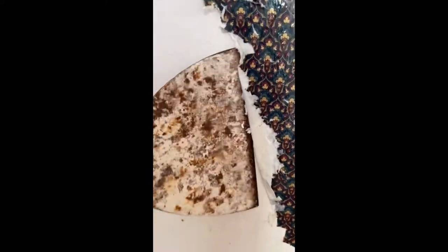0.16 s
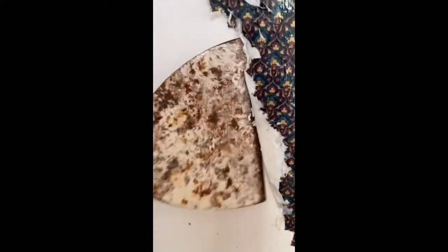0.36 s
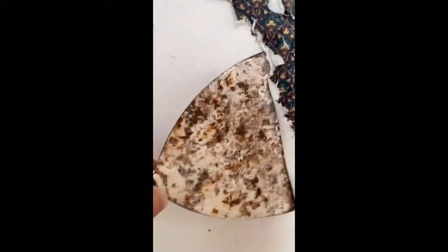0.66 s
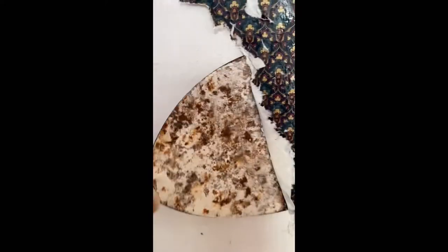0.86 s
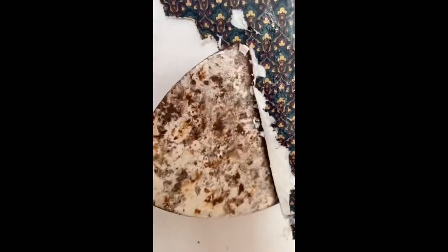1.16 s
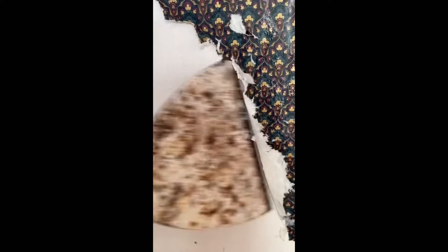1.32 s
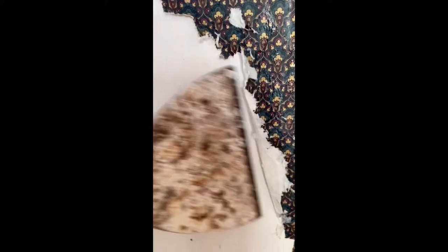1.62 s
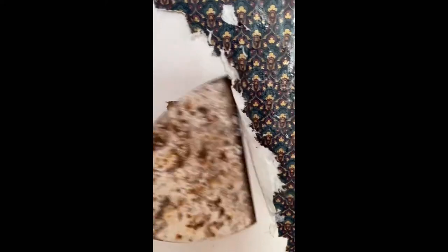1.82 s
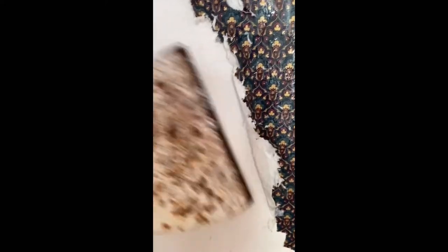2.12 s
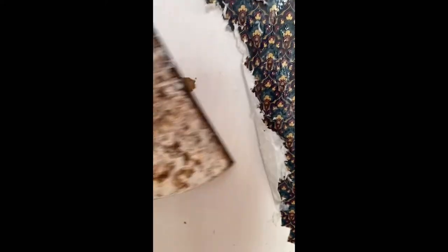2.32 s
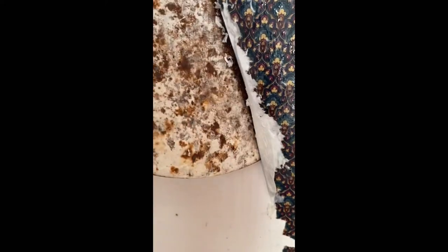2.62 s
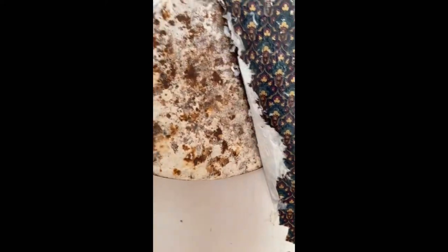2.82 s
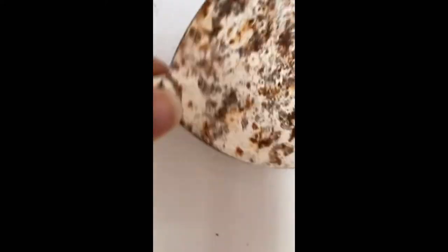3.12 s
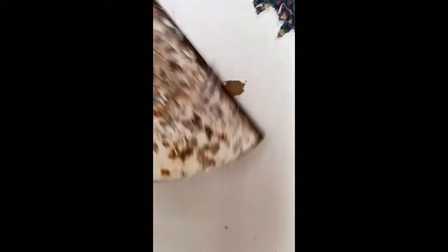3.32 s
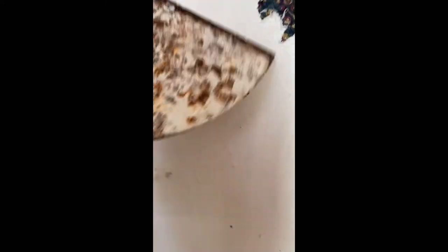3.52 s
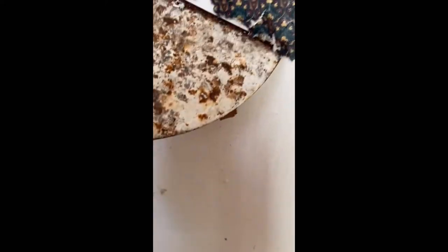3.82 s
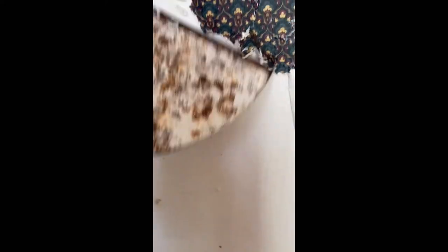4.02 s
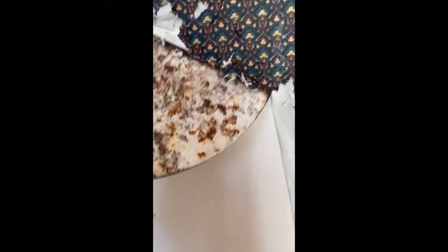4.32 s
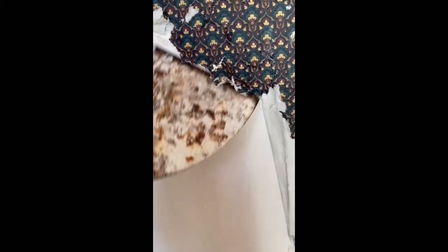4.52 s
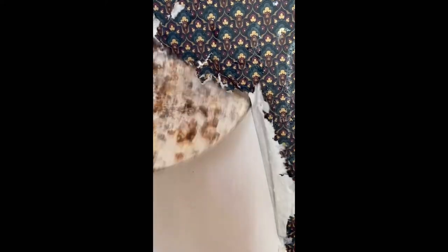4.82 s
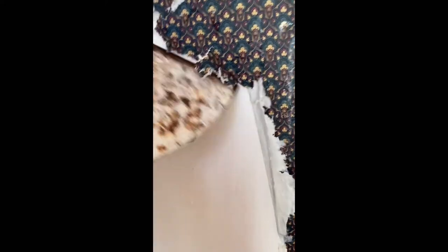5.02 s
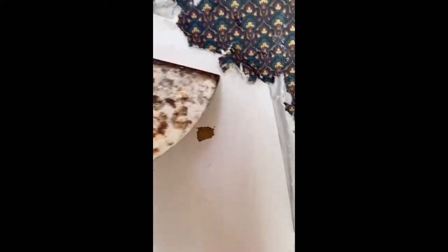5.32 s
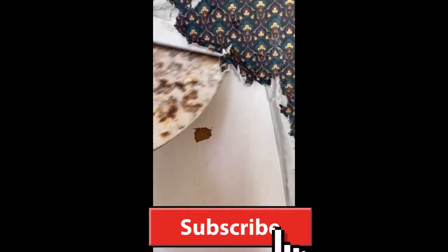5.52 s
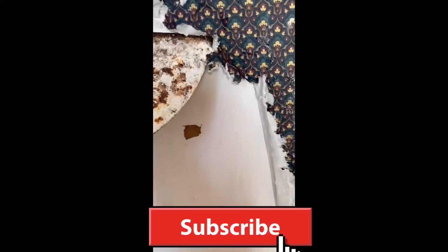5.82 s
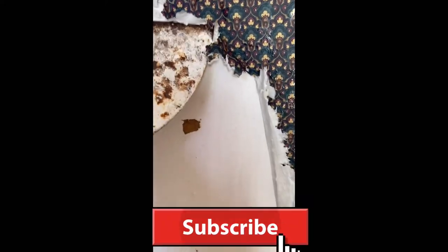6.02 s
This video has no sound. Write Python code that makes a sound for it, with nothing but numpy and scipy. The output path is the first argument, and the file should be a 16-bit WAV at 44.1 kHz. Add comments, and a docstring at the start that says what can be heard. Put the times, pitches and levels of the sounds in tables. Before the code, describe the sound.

A metal scraper works on a hollow wall, heard close up with short room reflections. Brief dry scratches rise and stop in woody, drum-like knocks, regular at first, then irregular with light scuffs, blade clicks and low wall rumble. Heavier pushes return later, then weaken. Two tiny crisp paper cracks occur late, over quiet low room noise.

```python
"""At a hollow wall in a bare room: a wide steel scraper is pushed under softened wallpaper, close to a two-port mic.
Grit clicks ring the blade modes, filtered clicks hiss off the paper, and the same hand shakes the wall modes.
Most pushes end in a thud as the edge jams: sinking sines, then a scattered rumble. The blade ticks now and then,
and two dry flakes crack. Sparse reflections give the room, drifting filtered noise its air; both ports hear it all."""
import sys
import numpy as np
from scipy import signal
from scipy.fft import rfft, irfft
from scipy.io import wavfile
from scipy.ndimage import uniform_filter1d

SR = 44100
rng = np.random.default_rng(int(sys.argv[2]) if len(sys.argv) > 2 else 0)


def to_wav(s):
    """Save 16-bit WAV."""
    ch = np.atleast_2d(s).T  # columns
    pcm = np.round(np.clip(ch, -1, 1) * 32767)  # PCM
    wavfile.write(sys.argv[1], SR, pcm.astype(np.int16))


N = 271656


def gain_of(db):
    """Amplitude factor of a level in dB."""
    return 10 ** (np.asarray(db) / 20)


def unit_rms(x):
    """Scales to RMS 1."""
    return x / np.sqrt(np.mean(x ** 2) + 1e-20)


def curve(points, hz):
    """Reads a frequency table, linear over log frequency."""
    f, value = np.transpose(points)
    return np.interp(np.log(hz + 1), np.log(f + 1), value)


def add(mix, start_s, sound):
    """Adds a sound in place, cut at the end of the mix."""
    part = mix[round(start_s * SR):][:len(sound)]
    part += sound[:len(part)]


def coloured(x, points):
    """Filters by a (hz, db) table, phase unchanged."""
    gain = gain_of(curve(points, np.fft.rfftfreq(len(x), 1 / SR)))
    return irfft(rfft(x) * gain, len(x))


def driven(modes, fall_db, centre_hz):
    """Weights modes by the drive, changed by fall_db one octave off its centre."""
    octaves = np.log2(np.transpose(modes)[0] / centre_hz)
    return modes + np.outer(fall_db * octaves ** 2, [0, 1, 0])


def ring(modes, length_s, spread_db):
    """One blow on an object, energy 1; the struck spot sets size, pitch and phase of each mode by chance."""
    hz, db, t60_s = np.transpose(modes)[:, :, None]
    t = np.arange(round(length_s * SR)) / SR
    size, detune, phase = rng.standard_normal((3, len(modes), 1))
    swing = np.sin(2 * np.pi * (hz * (1 + 0.017 * detune) * t + phase))
    rise = 1 - np.exp(-t * hz / 0.42)
    out = (gain_of(db + spread_db * size - 60 * t / t60_s) * swing * rise).sum(0)
    return out / np.linalg.norm(out)


def grit(size, per_s, spread_db):
    """Crumbs of plaster and paste catching the edge: random clicks of uneven size, RMS 1."""
    sizes = gain_of(spread_db * np.minimum(rng.exponential(1, size), 3))
    hits = rng.random(size) < per_s / SR
    return unit_rms(rng.standard_normal(size) * hits * sizes)


def scatter(x, t60_s):
    """Sparse decaying reflections of random sign, energy 1."""
    t = np.arange(round(t60_s * SR)) / SR
    taps = grit(len(t), 2000, 0.34) * gain_of(-60 * t / t60_s)
    return signal.fftconvolve(x, taps / np.linalg.norm(taps))


# blade modes: hz, level_db, t60_s
BLADE_MODES = [(418, 3, 0.032), (674, 4.5, 0.019), (907, 0.5, 0.021), (1268, 2.5, 0.017),
               (1577, 1.5, 0.018), (1950, -0.5, 0.015), (2291, 0, 0.019), (2716, -3, 0.0098),
               (3010, -13.5, 0.014), (3330, -14, 0.019), (3770, -19, 0.045), (4420, 0, 0.0064),
               (5160, -13, 0.035)]
# wall modes: hz, level_db, t60_s (free time in a stroke)
WALL_MODES = [(63.2, 5.5, 0.14), (91, -13, 0.14), (115, -7, 0.09), (156.2, 10, 0.15), (202.5, 0, 0.098),
              (263, 0, 0.12), (305, 0.5, 0.1), (362.3, 0.5, 0.072), (427.3, -1, 0.063), (624, -9, 0.078)]
# paper hiss colour, also of the tick's snap: hz, level_db
HISS_COLOUR = [(1500, -3), (3000, 2), (5200, -1.5), (6500, -4), (9000, -8.5), (11000, -14), (13500, -20),
               (15500, -34)]
SPOTS = 6  # places along the edge that the grit strikes
LEAN_S, LINGER_S = 0.015, 0.027  # the hand leans on the wall a little earlier and longer
GRATE_FALL_DB = -2.5  # drive one octave off its centre
HISS_SWELL = 0.75  # share of the swell that the hiss follows


def stroke(length_s, attack_s, mid_db, change_db, hiss_db, deep_db, upper_db, centre_hz, release_s):
    """Grit rings the blade at several spots, hisses off the paper and shakes the wall; starts LEAN_S early."""
    t = np.arange(-LEAN_S, length_s + LINGER_S + release_s, 1 / SR)
    # the edge sticks and slips
    judder = [unit_rms(j) for j in uniform_filter1d(rng.standard_normal((SPOTS + 2, len(t))), 180)]
    swell_db = change_db * (np.clip(t / length_s, 0, 1) - 1)
    contact = np.clip(np.minimum(t / attack_s, 1 + (length_s - t) / release_s), 0, 1)
    force = gain_of(mid_db + change_db / 2) * contact ** 0.84

    modes = driven(BLADE_MODES, GRATE_FALL_DB, centre_hz)
    blade = 0
    for j in judder[:SPOTS]:
        clicks = force * gain_of(swell_db + 2.6 * j) * grit(len(t), 800, 1.6)
        blade = blade + signal.fftconvolve(clicks, ring(modes, 0.04, 4.5)) / np.sqrt(SPOTS)

    hiss_gain = gain_of(hiss_db + HISS_SWELL * swell_db + 0.95 * judder[-2])
    paper = unit_rms(coloured(grit(len(t), 9000, 1.0), HISS_COLOUR))
    hiss = force * contact * hiss_gain * paper

    lean_shape = np.clip(np.minimum(1 + t / LEAN_S, (t[-1] - t) / LINGER_S), 0, 1) ** 2
    shake = gain_of(mid_db + 1.5 * judder[-1]) * lean_shape * grit(len(t), 2500, 0.6)
    deep = [m for m in WALL_MODES if m[0] < 225]
    upper = [m for m in WALL_MODES if m[0] > 225]
    out = signal.fftconvolve(shake * gain_of(deep_db), ring(deep, 0.15, 1.64))
    out += signal.fftconvolve(shake * gain_of(upper_db), ring(upper, 0.15, 1.64))
    add(out, 0, blade)
    add(out, 0, hiss)
    return out


# pushes up to a jam: start_s, jam_s, jam_db (grating), swell_db, hiss_db (above grating), centre_hz (drive)
PUSHES = [(0.073, 0.107, -36.5, 6, -10, 1190), (0.309, 0.348, -32.5, 4.5, -9.5, 1780),
          (0.553, 0.591, -32.5, 2.5, -9, 1950), (0.787, 0.824, -28, 14, -8.5, 1520),
          (1.045, 1.099, -30.5, 8.5, -16.5, 2000), (1.302, 1.34, -34, 11, -10.5, 1370),
          (1.572, 1.622, -31, 5.5, -12, 1500), (1.832, 1.872, -34, 0, -8, 1500),
          (4.109, 4.179, -28.5, 10.5, -9.5, 1590), (4.726, 4.794, -25.5, 13.5, -10, 1510),
          (4.996, 5.045, -45.5, 7, -6, 1000), (5.316, 5.359, -40.5, -2.5, -1, 1380),
          (5.598, 5.641, -43.5, -6, -7.5, 885)]
PUSH_ATTACK_S, PUSH_RELEASE_S = 0.031, 0.014
PUSH_DEEP_DB, PUSH_UPPER_DB = -1, -4.5  # wall rumble, above the mid-push grating


def add_pushes(work):
    """Pushes gather speed and change in level until the edge jams, most of them swelling."""
    for start_s, jam_s, jam_db, swell_db, hiss_db, centre_hz in PUSHES:
        sound = stroke(jam_s - start_s, PUSH_ATTACK_S, jam_db - swell_db / 2, swell_db, hiss_db,
                       PUSH_DEEP_DB, PUSH_UPPER_DB, centre_hz, PUSH_RELEASE_S)
        add(work, start_s - LEAN_S, sound)


# free scrapes: start_s, length_s, attack_s, mid_db (grating), change_db (start to end),
# hiss_db, deep_db, upper_db (hiss and wall rumbles above grating), centre_hz (drive)
SCRAPES = [(0.244, 0.045, 0.011, -43, 1, -13, -17, -5, 1500),
           (0.471, 0.072, 0.012, -44, -4, -10, -9, -17, 1500),
           (0.723, 0.049, .016, -39.5, -8, -12, -18, -18, 1670),
           (0.939, 0.066, .016, -40, -5, -11, -13, -7.5, 1510),
           (1.462, 0.055, .016, -40, 19.5, -20, -11, -6, 1400),
           (1.748, 0.03, 0.013, -42, -9, -15, -4, 1, 800),
           (2.03, 0.13, 0.018, -45.5, -5, 1.5, -1, 8.5, 1100),
           (2.269, 0.068, .016, -54, -2, 2, 17, 15.5, 1200),
           (2.357, 0.046, 0.0056, -38.5, -1, -17, -4, -1, 1070),
           (2.411, 0.022, 0.0036, -39, 4, -22, 7.5, 3, 1390),
           (2.933, 0.036, 0.015, -42, -13, -0.5, 7.5, 5, 1400),
           (2.965, 0.024, 0.015, -45.5, -5, -5, 16.5, 7.5, 1200),
           (2.994, 0.058, 0.01, -45, 0, 0, 12.5, 9.5, 1200),
           (3.12, 0.08, 0.009, -58.5, -13, 12.5, 18, 15, 1200),
           (3.203, 0.047, 0.0034, -35, -9.5, -16, -6, 1.5, 1190),
           (3.255, 0.031, 0.014, -45.5, 0, -2, -8, 2.5, 1500),
           (3.423, 0.11, 0.019, -44.5, -3, -4.5, 7, 7.5, 1110),
           (3.534, 0.05, 0.013, -44, -4, -3, 5, 12, 1400),
           (3.79, 0.047, 0.018, -56, 2, -1, 16.5, 13.5, 1200),
           (4.008, 0.064, 0.02, -37.5, -11, -9, -6, -5, 1590),
           (4.348, 0.06, 0.0098, -45, -7, -7.5, -7, 0, 1200),
           (4.454, 0.049, 0.019, -39, -5, -8.5, 8.5, 4, 1220),
           (4.599, 0.061, .013, -34, -2, -12, -13, -4, 1990),
           (4.66, 0.034, .008, -40.5, -14, -13, -18, -3, 1400),
           (6.095, 0.077, 0.0085, -40.5, -7, -1, 9, 4, 1210)]
SCRAPE_RELEASE_S = 0.01


def add_scrapes(work):
    """Free scrapes: the same friction stroke, each with its own attack and wall rumble."""
    for start_s, *settings in SCRAPES:
        add(work, start_s - LEAN_S, stroke(*settings, SCRAPE_RELEASE_S))


# parts of a blow (knock, punch, body, drum, thump): hz (nominal, settled), rise_s, t60_s
BLOW_PARTS = [(582, 0.00052, 0.0091), (447.2, 0.0014, 0.05), (276.4, 0.0022, 0.03), (155.5, 0.0039, 0.099),
              (75.9, 0.0057, 0.099)]
# what the cavity behind the board keeps: hz, level_db
CAVITY_COLOUR = [(50, 7.5), (160, -1), (250, 6), (340, -1.5), (450, -0.5), (600, 4.5), (850, -5)]
RUMBLE_DB = -9  # after-rumble, on top of the cavity colour
WALL_RING_DB = -15.5  # board modes in the rumble, relative to the blow


def thud(*peaks_db):
    """Bending waves arrive high ones first, so each part starts sharp and sinks; then the hollow wall rumbles."""
    t, blow = np.arange(round(0.15 * SR)) / SR, 0
    for (hz, rise_s, t60_s), peak_db in zip(BLOW_PARTS, peaks_db):
        sinking_hz = hz * rng.uniform(0.94, 1.03) * (1 + np.exp(-t / (1.177 * rise_s)))
        swing = np.sin(2 * np.pi * np.cumsum(sinking_hz) / SR)
        part = swing * (1 - np.exp(-t / rise_s)) ** 2 * gain_of(-60 * t / t60_s)
        blow = blow + gain_of(peak_db) * part / abs(part).max()

    out = gain_of(RUMBLE_DB) * coloured(scatter(blow, 0.56), CAVITY_COLOUR)
    upper = np.multiply(WALL_MODES[5:], [1, 1, 1.5])  # upper modes, ringing 1.5 times as long
    board = signal.fftconvolve(scatter(blow, 0.36), ring(upper, 0.22, 2.4))
    add(out, 0, gain_of(WALL_RING_DB) * board * np.linalg.norm(blow) / np.linalg.norm(board))
    out *= 1 - np.exp(-np.arange(len(out)) / SR / 0.006)  # the rumble builds up
    add(out, 0, blow)
    return out


# edge jams: start_s, knock_db, punch_db, body_db, drum_db, thump_db (peak of each part)
THUDS = [(0.105, -38, -32.5, -36, -26.5, -24), (0.348, -18, -24.5, -13, -10.5, -21),
         (0.59, -29, -30.5, -27.5, -11, -19), (0.822, -20.5, -28.5, -24, -17.5, -21),
         (1.101, -23, -12, -7, -8.5, -17.5), (1.34, -18, -22, -14.5, -20, -24),
         (1.608, -22, -33, -23, -20, -21), (1.631, -25.5, -20.5, -11.5, -12, -23),
         (1.8697, -21, -7.5, -5.5, -10, -18.5), (2.379, -30, -26, -25, -44, -41),
         (2.944, -36, -34, -25.5, -25, -19), (3.353, -17.5, -24, -14, -22, -28),
         (4.174, -18, -23.5, -15, -23, -29), (4.184, -22.5, -33, -9.5, -13, -19.5),
         (4.796, -19, -28, -11.5, -13.5, -19), (5.038, -32, -38.5, -24.5, -21, -25.5),
         (5.36, -34, -38, -29, -18.5, -22), (5.632, -26, -43, -25, -19.5, -26.5),
         (5.794, -53, -52, -42, -43, -50)]


def add_thuds(work):
    """The jammed edge passes each blow to the hollow wall."""
    for start_s, *peaks_db in THUDS:
        add(work, start_s, thud(*peaks_db))


TICK_FALL_DB = -15.5  # drive one octave off its centre


def tick(ring_db, snap_db, centre_hz, held):
    """The edge chatters for some milliseconds at a few spots: a short blade ring with a dry snap on top."""
    t = np.arange(round(0.017 * SR)) / SR
    envelope = gain_of(-60 * t / 0.022) * (1 - np.exp(-t / 0.00051))
    chatter = rng.standard_normal((SPOTS, len(t))) * envelope
    # pressed flat, it dies sooner
    modes = driven(BLADE_MODES, TICK_FALL_DB, centre_hz) * [1, 1, max(held, 0.1)]
    out = sum(signal.fftconvolve(c, ring(modes, 0.04, 0.87)) for c in chatter)
    out = out / abs(out).max()
    snap = coloured(chatter[0], HISS_COLOUR)
    add(out, 0, gain_of(snap_db) * snap / abs(snap).max())
    return gain_of(ring_db) * out


# blade on a hard spot: start_s, ring_db (peak), snap_db (above ring), centre_hz (drive),
# held (share of free ring time left, 0-1)
TICKS = [(0.331, -33, -20, 1500, 0.66), (0.3495, -31, -18, 2000, .4), (0.589, -23, -22, 2200, 0.98),
         (0.821, -22, -18, 1680, 1), (1.097, -23.5, -2, 1390, 1), (1.3405, -28, -20, 1690, 0.4),
         (1.474, -30, -28, 1714, .4), (1.51, -16, -23, 1410, 0.34), (1.87, -27.5, -3, 2000, 0.52),
         (1.931, -35, -25, 656, .6), (1.993, -32.5, -9, 3050, 0.19), (2.3571, -27, -16, 990, 0.45),
         (2.94, -30, -3, 1900, 0.77), (3.043, -41, 12, 2500, .4), (3.204, -28, -12, 1600, 0.36),
         (3.3488, -12.5, -13, 2120, 0.45), (3.3536, -16.5, -32, 1200, 0.77), (3.389, -41, -20, 1300, .8),
         (3.464, -28, -24, 2150, 0.47), (3.47, -32, -22, 2100, 0.36), (3.499, -36, -21, 1100, .5),
         (3.558, -32, -18, 2400, .9), (3.586, -39, -27, 2400, 0.99), (3.6544, -29.5, 2, 2860, 0.48),
         (4.617, -35, -16, 1610, .6), (4.793, -21, -15, 1390, 0.78), (5.485, -32.5, -6, 2500, 0.17),
         (5.6306, -60, 21, 1500, .5)]


def add_ticks(work):
    """The blade knocks hard spots."""
    for start_s, *settings in TICKS:
        add(work, start_s, tick(*settings))


def crack(level_db, hz):
    """A few cycles, very high and dry."""
    t = np.arange(round(0.004 * SR)) / SR
    rise = 1 - np.exp(-t / 0.000099)
    # 2.0 offsets the peak lost to the rise
    return 2.0 * gain_of(level_db - 60 * t / 0.0018) * np.sin(2 * np.pi * hz * t) * rise


# dry paper flakes: start_s, level_db (approximate peak), hz
FLAKES = [(5.158, -37, 9150), (6.101, -22, 9200)]


def add_cracks(work):
    """Dry flakes of paper crack."""
    for start_s, *settings in FLAKES:
        add(work, start_s, crack(*settings))


def bare_room(work):
    """Adds sparse reflections of the work, 12 dB down."""
    tail = scatter(work, 0.87)[:N]
    return work + gain_of(-12) * coloured(tail, [(600, 0.36), (3000, 0.89)])


PATHS, PATH_S = 12, 0.02  # number of unlike paths; spacing of the steady crossfades between them


def unlike_paths(x, length_s):
    """Same spectrum, phases stirred within a few milliseconds by random filters that crossfade in turn."""
    t, place, out = np.arange(round(length_s * SR)) / SR, np.arange(N) / SR / PATH_S, np.zeros(N)
    for k in range(PATHS):
        turn = rfft(rng.standard_normal(len(t)) * gain_of(-40 * t / length_s), 2048)
        away = abs((place - k + PATHS / 2) % PATHS - PATHS / 2)
        fade = np.cos(np.pi / 2 * np.minimum(away, 1))
        out += signal.oaconvolve(x * fade, irfft(turn / abs(turn)))[:N]
    return out


# port balance, full above 620 Hz: hz, left_minus_right_db
PORT_BALANCE = [(300, 1), (550, 4), (900, 6), (1700, 0), (2800, 1), (4500, -2.5), (5200, 0)]


def ports(near, other, lead, same):
    """Splits a sound over both ports; `other` is the part that reaches them by unlike paths."""
    hz = np.fft.rfftfreq(N, 1 / SR)
    apart = np.clip((hz / 620) ** 1.5, 0.08, 1)  # long waves strike both ports alike
    angle = apart * np.arccos(np.clip(same(hz), 0, 1)) / 2
    half = np.exp(0.5j * apart * lead(hz)) * gain_of(apart * curve(PORT_BALANCE, hz) / 2)
    shared, unlike = rfft(near) * np.cos(angle), rfft(other) * np.sin(angle)
    return irfft([(shared + unlike) * half, (shared - unlike) / half], N)


# left port ahead, full above 620 Hz: hz, lead_rad
PORT_LEAD = [(300, 0), (1400, -.4), (2100, .2), (2900, 1.5), (3700, .6), (4400, 1.2), (5000, .2),
             (5800, 1.1), (6900, 3.14), (7700, 3.14), (9700, 6.28), (11500, 6.28), (12600, 9.42)]
# likeness of the ports, full effect above 620 Hz: hz, likeness (0-1)
PORT_LIKENESS = [(250, 0.71), (700, 0.64), (2100, 0.45), (2800, 0), (3800, 0.5), (4500, 0.34), (5300, 1),
                 (6400, 0.86), (6900, 0.99), (7700, 1), (9200, 0.6), (9800, 0.88), (11500, 1), (11900, 0.4),
                 (12800, 0.94)]


def near_wall(work):
    """The near wall reaches both ports, partly by unlike paths."""
    return ports(work, unlike_paths(work, 0.0082),
                 lambda hz: curve(PORT_LEAD, hz), lambda hz: curve(PORT_LIKENESS, hz))


# room noise colour, relative: hz, density_db (per Hz)
AIR_COLOUR = [(25, -31), (33, -20), (42, 1), (70, 4.5), (150, -7.5), (300, -7.5), (500, -12.5), (800, -13),
              (1100, -16.5), (2000, -20.5), (2250, -20.5), (2400, -20), (2600, -22.5), (4700, -26.5),
              (5160, -25.5), (5600, -29), (7000, -29.5), (10000, -36.5), (13000, -45), (14500, -58)]
# lead added for sound from the room: hz, lead_rad
ROOM_LEAD = [(200, 0), (1300, 2.5), (2500, 0.5), (3300, 0)]
# factor on the likeness for sound from the room: hz, factor (0-1)
ROOM_LIKENESS = [(300, 0.47), (1000, 0), (2200, 0), (2800, 1)]
AIR_DB = -39  # RMS before the ports


def air():
    """Steady room noise with drifting patches, from all around."""
    frames, hz = N // 256 + 5, np.fft.rfftfreq(1024, 1 / SR)
    re, im = rng.standard_normal((2, 2, 513, frames))
    patches = uniform_filter1d(rng.standard_normal((513, frames)), 10, 0)
    patches = unit_rms(uniform_filter1d(patches, 12, 1))
    spectra = (re + 1j * im) * gain_of(curve(AIR_COLOUR, hz)[:, None] + 1.68 * patches)
    noise = signal.istft(spectra, nperseg=1024, noverlap=768)[1][:, :N]
    a, b = gain_of(AIR_DB) * unit_rms(noise)
    return ports(a, b, lambda f: curve(PORT_LEAD, f) + curve(ROOM_LEAD, f),
                 lambda f: curve(PORT_LIKENESS, f) * curve(ROOM_LIKENESS, f))


def scene():
    """Work on the wall with its room reflections, over the room noise."""
    work = np.zeros(N)
    add_pushes(work)
    add_scrapes(work)
    add_thuds(work)
    add_ticks(work)
    add_cracks(work)
    return near_wall(bare_room(work)) + air()


EDGE_HZ = 15800


def record(dry):
    """The microphone drops the deepest bass; then the band limit."""
    thin = signal.sosfilt(signal.butter(3, 36, "high", fs=SR, output="sos"), dry)
    low_pass = signal.firwin(511, EDGE_HZ, window=("kaiser", 9), fs=SR)
    return signal.oaconvolve(thin, low_pass[None], "same")


dry = scene()
out = record(dry)
to_wav(out)
```